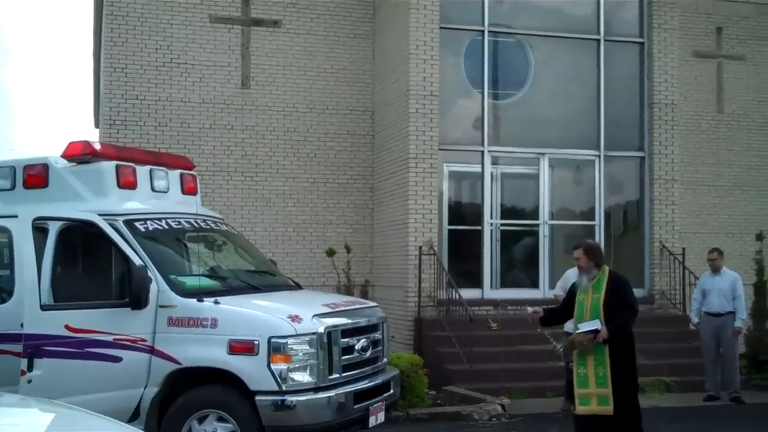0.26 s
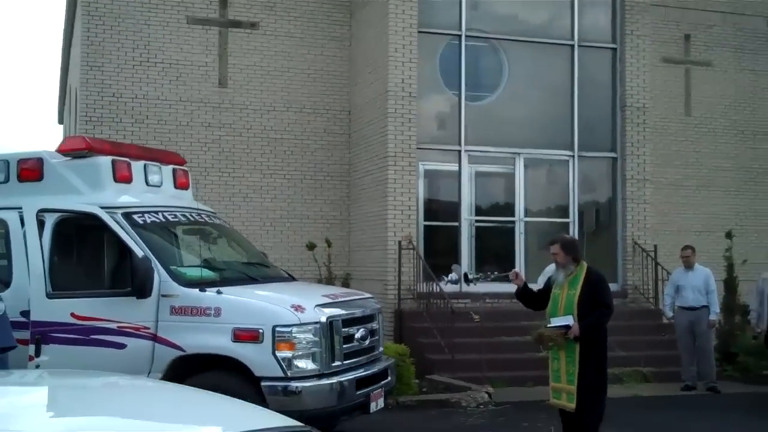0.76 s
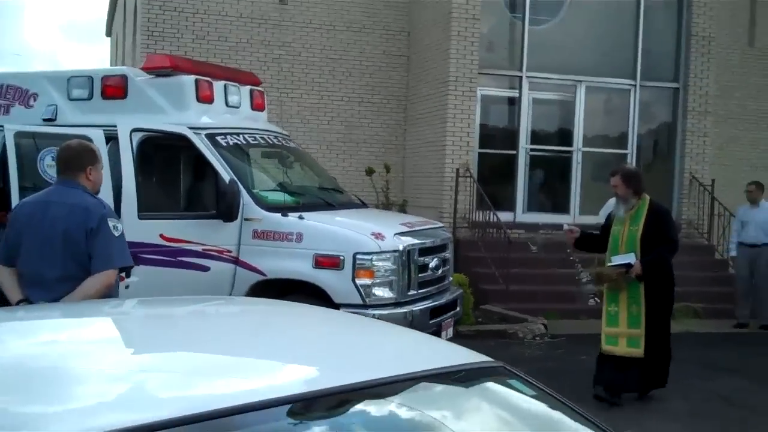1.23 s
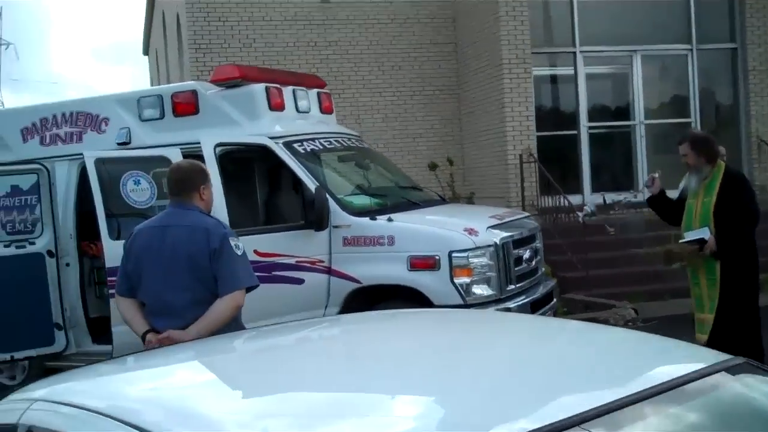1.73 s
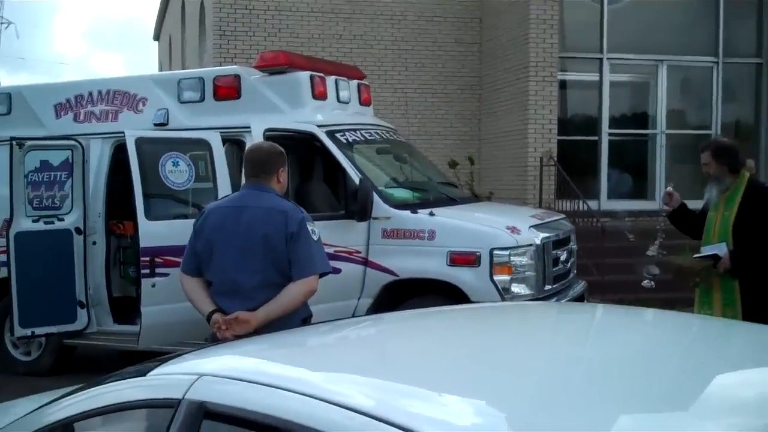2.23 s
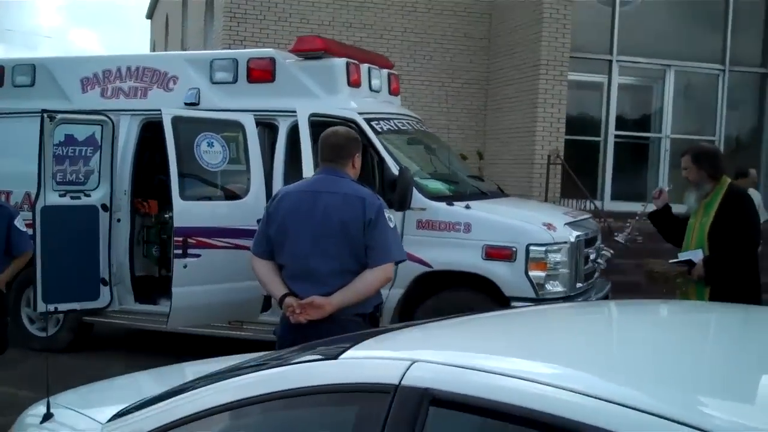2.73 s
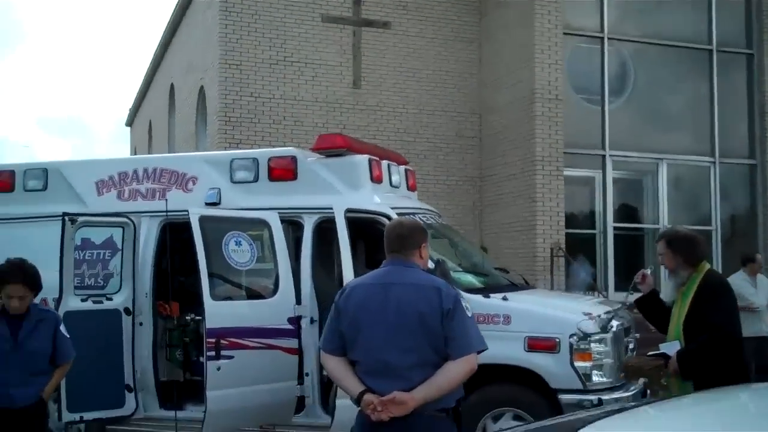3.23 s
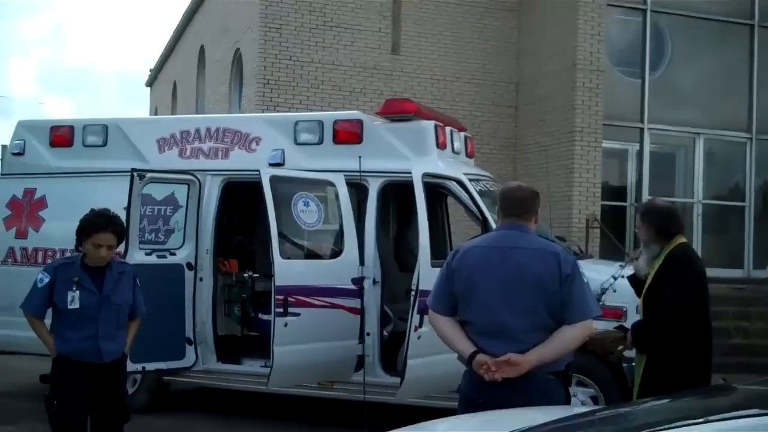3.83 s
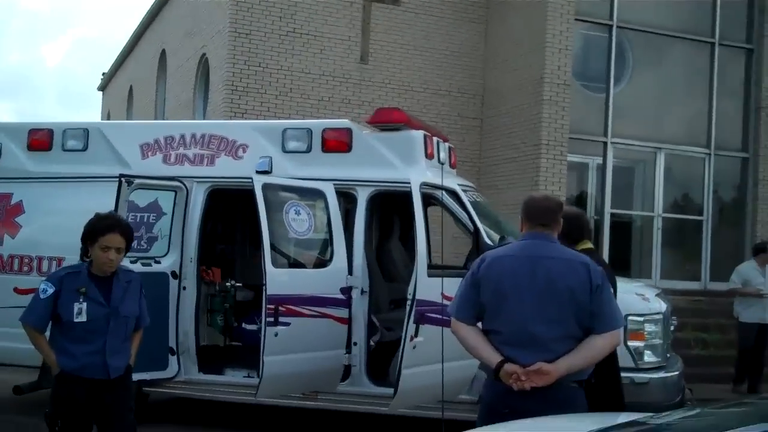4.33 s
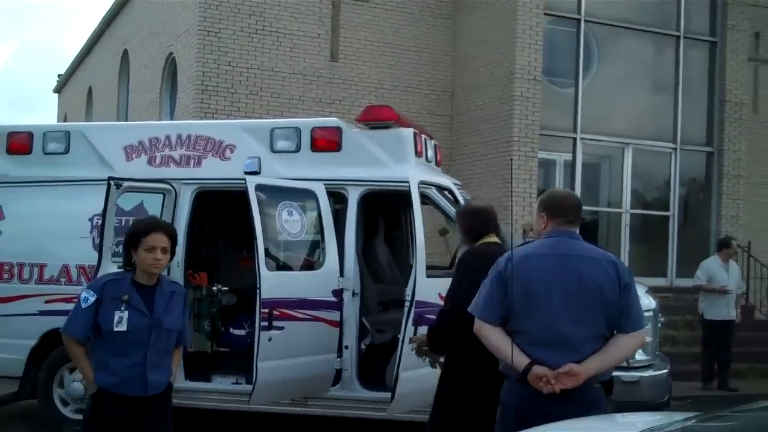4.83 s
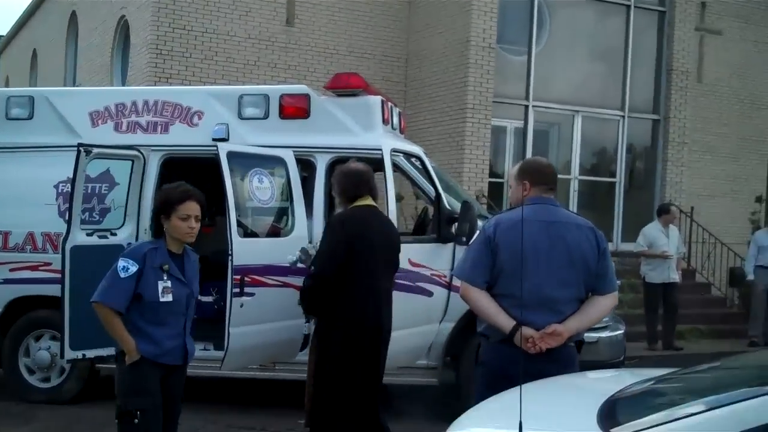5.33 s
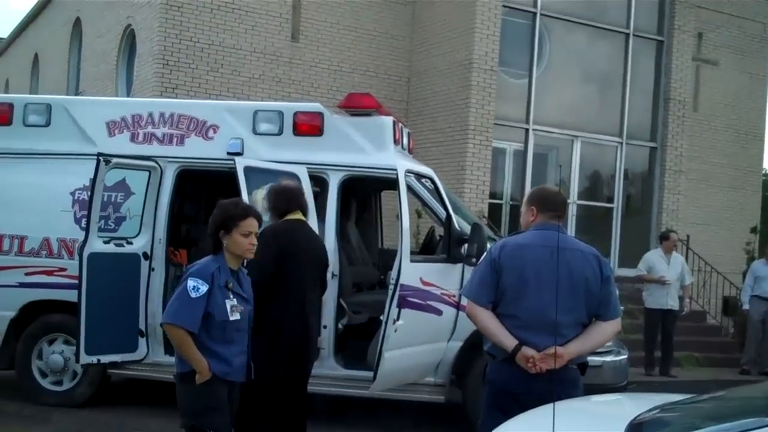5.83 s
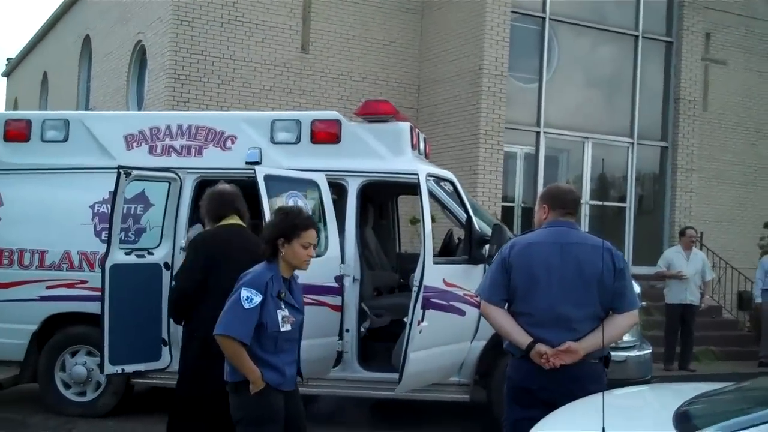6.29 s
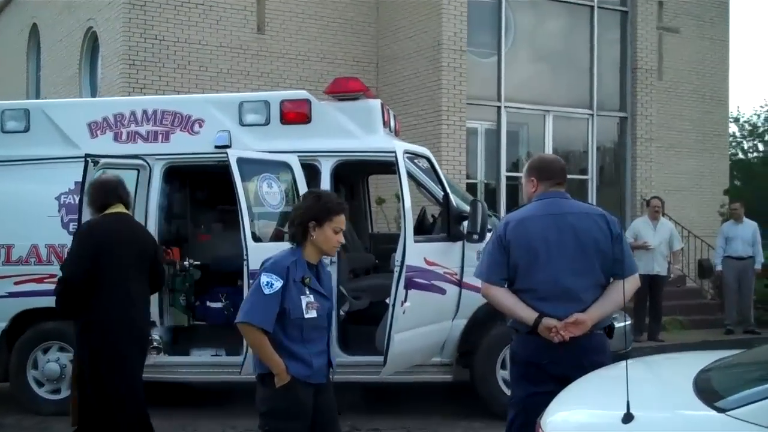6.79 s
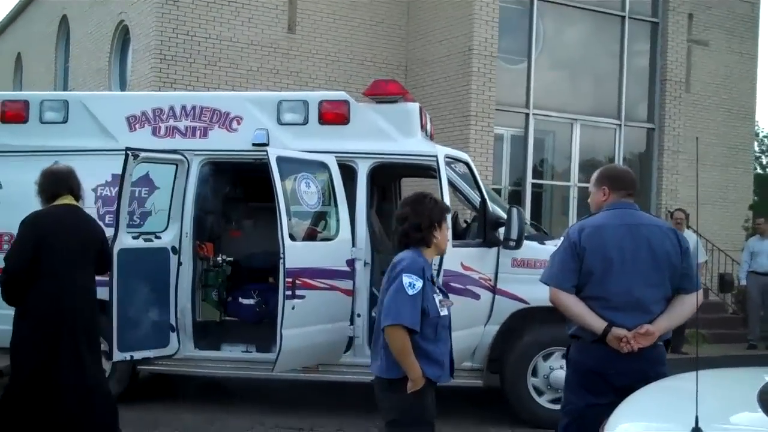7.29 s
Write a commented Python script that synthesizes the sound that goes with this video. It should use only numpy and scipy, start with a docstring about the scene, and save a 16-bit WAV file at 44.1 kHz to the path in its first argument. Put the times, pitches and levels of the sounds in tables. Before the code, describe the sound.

Small metal bells with loose pellets jingle on a swinging chain, a little left of a handheld stereo camera. Crisp high tinkles, short low clinks and brief ringing tones come irregularly, each swelling sharply and dying away. Busy at first, they thin into separated lighter shakes. Nearby hard surfaces return a short bright echo. Far traffic rushes softly throughout with a faint steady hum, and a few tiny bird chirps appear late.

```python
"""Loose pellets rattle in the small bells of a swung censer, outdoors, left of a camera, over far traffic and a hum.
The rattle is thousands of damped sines that swell with each jolt of the chain; the traffic is shaped noise.
Bells clink together as bursts of shell modes; single beating bell tones run from short low clinks to held rings.
A van and a brick wall answer as a decaying noise echo; late on, a bird chirps in short sine glides."""
import sys
import numpy as np
from scipy import signal
from scipy.fft import rfft, irfft, next_fast_len
from scipy.io import wavfile
from scipy.ndimage import map_coordinates

SR = 44100
rng = np.random.default_rng(int(sys.argv[2]) if len(sys.argv) > 2 else 0)


def dump_mix(stems):
    """Bounce the given channels to the path in sys.argv[1] as a 16-bit WAV at rate SR."""
    frames = np.atleast_2d(stems).T  # one column per channel
    limited = np.clip(frames, -1, 1)  # hard clip at full scale
    pcm = np.round(limited * 32767).astype(np.int16)
    wavfile.write(sys.argv[1], SR, pcm)


N = 332955  # length in samples

# Jerks of the chain that throw the pellets up: start_s (peak), level_db (peak), settling_t60_s
CHAIN_JOLTS = [(0.02, -33.5, 5), (0.15, -27, 0.38), (0.39, -31, 0.7), (0.86, -25, 0.77), (1.343, -27, 1.1),
               (2.016, -16, 0.25), (2.13, -31, 2.1), (2.335, -30.5, 7.4), (3.1, -20.5, 0.64),
               (3.56, -30.5, 4.5), (4.174, -24.5, 0.43), (4.5, -37, 6.6), (4.64, -29.5, 1.9),
               (4.77, -22.5, 0.19), (5.145, -35.5, 0.97), (5.339, -24, 0.1), (5.7, -26, 0.12),
               (5.76, -29.5, 0.5), (5.88, -27, 0.59), (6.389, -28.5, 0.36), (6.428, -21, 0.29),
               (6.812, -30, 0.6), (6.945, -28, 0.71), (7.279, -28, 0.24), (7.16, -42.5, 4.6),
               (7.501, -23.5, 2.2)]
# Shell modes of the bells: pitch_hz, level_db (relative)
SHELL_MODES = [(2420, -4), (2490, -3), (2650, -8.5), (2990, -4.5), (3195, -4.5), (3285, -7), (3575, -2),
               (3980, -11), (5000, -7), (5140, -10), (6200, -3), (6850, 0), (7080, 8), (7520, 5.5),
               (8080, -1), (9100, -10.5), (9710, -14.5), (11250, -15.5), (12300, -19.5), (12850, -19.5),
               (13500, -19)]
# Drift of the tone colour: start_s, low_modes_db, top_band_db
TONE_DRIFT = [(0, -3.5, -2), (3, -2, -0.5), (4.5, -3, -3.5), (5.3, -5.5, 5.5), (6, -1, -1),
              (6.5, -3.5, 8.5), (7.55, -3, 1.5)]
# Spectrum of the contact noise: frequency_hz, density_db (relative, per Hz)
CONTACT_SPECTRUM = [(1500, -15.5), (3000, 2.5), (5400, 0), (7300, 5), (10000, -11), (14000, -28)]
# Treble-rich answer of the walls: frequency_hz, level_db
WALL_ECHO = [(2500, -10), (12000, 2)]
# Echo balance between the ports: frequency_hz, right_minus_left_db
ECHO_BALANCE = [(3000, 7.5), (8000, 2), (13000, -2.5)]
# Spectrum of the traffic rush: frequency_hz, density_db (relative, per Hz)
TRAFFIC_SPECTRUM = [(15, -52), (40, 3.5), (120, 2), (730, 1.5), (1300, -1.5), (2300, -6.5), (5000, -15),
                    (9000, -22.5), (14300, -38)]
# Slow swell of the traffic, before its random waver: start_s, level_db
TRAFFIC_SWELL = [(0, -40), (7.55, -37)]
# Left-right likeness of the traffic: frequency_hz, correlation (1 = identical)
TRAFFIC_LIKENESS = [(30, 0.7), (130, 0.97), (640, 0.94), (1400, 0.66), (6770, 0.1)]
# The two machine tones: pitch_hz of the low one, pitch_hz of the high one
HUM_PITCHES = (328.7, 661)
# Strength of the machine tones, before their waver: start_s, low_tone_db, high_tone_db
HUM_LEVELS = [(0.17, -64, -53), (1.26, -58, -53), (1.49, -47, -54), (3.57, -58, -54), (4.96, -44.5, -51.5),
              (5.95, -54.5, -62), (7.53, -47.5, -63)]
# Bell on bell: start_s, level_db (relative), low_modes_db (low modes against high)
BELL_CLINKS = [(0.112, -17, -10), (0.268, -10, -3), (0.304, -9.5, -14), (0.529, -9.5, -17),
               (0.6787, -23, -8), (0.846, -14.5, -16), (0.899, -4, -12), (1.04, -26, 2), (1.2096, -17.5, 2),
               (1.2451, -15.5, 0), (1.366, -13.5, -1.5), (1.4655, -14, -7), (1.705, -18.5, 2),
               (1.7874, -13, -4.5), (1.968, -15, 5.5), (2.0035, -6.5, -12), (2.018, -24, -12),
               (2.121, -10.5, -0.5), (2.3287, -16, 3.5), (2.386, -16.5, -2), (2.459, -12, -9),
               (2.4827, -10.5, -1), (2.526, -4.5, -12), (2.6761, -19, -13), (2.7135, -15, 1),
               (2.7802, -13.5, -1), (2.942, -20, -20), (2.9811, -10, -36.5), (3.0904, -4.5, -3.5),
               (3.1377, -7, 0.5), (3.27, -13.5, 6.5), (3.3981, -8, 1), (3.457, -9, -5.5), (3.546, -3, -8.5),
               (3.5996, -5, -5), (3.7512, -33, 19), (3.9214, -13.5, -21), (4.0305, -19.5, -9),
               (4.494, -26.5, 8), (4.5973, -14, -9), (4.644, -14.5, -8), (4.9798, -19, -1.5),
               (5.1405, -17.5, -25), (5.192, -17, -29), (5.2145, -7.5, -37), (5.2785, -14, -4),
               (5.3218, -17, 0), (5.3462, -4, -21), (5.687, -12, -9), (5.876, -12.5, -6),
               (6.4163, -11.5, -22), (6.8052, -23, -12), (6.868, -19.5, -5), (6.929, -16, -8),
               (6.986, -18, -10), (7.0795, -14, -23.5), (7.264, -21, -15), (7.423, -21.5, -4)]
# Single bell tones, from short low clinks to held rings: start_s, pitch_hz, level_db, length_s (until damped)
BELL_TONES = [(0.114, 2450, -19, 0.0055), (0.117, 3970, -26.5, 0.025), (0.14, 2656, -31.5, 0.12),
              (0.264, 3280, -20.5, 0.0054), (0.898, 3190, -26, 0.14), (0.997, 2450, -26, 0.028),
              (1.041, 3194, -17.5, 0.052), (1.129, 3200, -31, 0.039), (1.191, 2476, -28, 0.019),
              (1.702, 2910, -32, 0.028), (1.803, 2454, -31, 0.044), (1.963, 3015, -24.5, 0.13),
              (1.992, 2620, -11, 0.004), (1.995, 2454, -13.5, 0.0092), (2.009, 3600, -22, 0.025),
              (2.119, 3010, -24, 0.034), (2.327, 5210, -24.5, 0.0061), (2.483, 1760, -35, 0.044),
              (2.587, 3200, -29, 0.042), (2.713, 2507, -23, 0.016), (3.137, 2970, -19.5, 0.053),
              (3.138, 4960, -11, 0.0029), (3.144, 2485, -33, 0.1), (3.261, 2963, -24.5, 0.05),
              (3.284, 2483, -14, 0.011), (3.535, 2450, -20, 0.054), (3.543, 2580, -18, 0.0095),
              (3.58, 2530, -27, 0.023), (4.032, 3977, -36.5, 0.039), (4.165, 2420, -19.5, 0.0029),
              (4.168, 2940, -33.5, 0.093), (4.289, 2990, -34.5, 0.064), (4.397, 2490, -33, 0.032),
              (4.495, 5040, -26, 0.011), (4.603, 3010, -27, 0.024), (4.713, 2560, -25.5, 0.01),
              (4.784, 3950, -38, 0.043), (5.283, 2994, -27.5, 0.045), (5.326, 3170, -29.5, 0.034),
              (5.364, 3040, -37, 0.13), (5.474, 6080, -27.5, 0.011), (5.703, 3110, -33, 0.066),
              (6.378, 3170, -34, 0.07), (6.577, 3050, -34.5, 0.032), (6.796, 3220, -36, 0.037),
              (7.265, 2485, -28, 0.024), (7.513, 3270, -30.5, 0.017), ]
# Chirps, each one glide: start_s, length_s, first_pitch_hz, last_pitch_hz, level_db
BIRD_GLIDES = [(6.12, .035, 5500, 5250, -47), (6.58, .06, 3600, 5900, -41), (6.66, .04, 6000, 4800, -41),
               (7.17, .045, 5100, 4450, -41)]
# Camera body shades the right port: frequency_hz, left_minus_right_db
CAMERA_SHADOW = [(1300, 0.5), (4400, 2.5), (8000, 10.5), (14000, 14.5)]

HIGH_MODES_HZ = 5500  # splits low rings from high tinkle
TOP_MODES_HZ, THIN_MODES_HZ = 7350, 8500  # the top band lies between; the thin shimmer above
RISE_DB_PER_S = 318  # how fast a jolt builds up
AFTER_DB, AFTER_T60_S = -17.5, 0.23  # a clink throws the pellets: rattle against the clink level, settling time
REST_DB = -42.5  # rattle between jolts
CONTACT_S = 0.0002  # time constant with which a clink wakes the modes
EDGE_HZ, TOP_HZ = 14250, 15500  # the treble steps down, then ends


def amp(db):
    """dB to gain."""
    return 10 ** (np.asarray(db) / 20)


def unit(x):
    """Scale to rms 1."""
    return x / np.sqrt(np.mean(x ** 2) + 1e-20)


def along(points, hz):
    """Read (frequency, value) points on a log frequency axis."""
    f, v = np.transpose(points)
    return np.interp(np.log(hz + 1), np.log(f + 1), v)


def curves(rows):
    """One value per sample for each column after the time."""
    s, *cols = np.transpose(rows)
    return [np.interp(np.arange(N) / SR, s, c) for c in cols]


def wobble(rate):
    """A smooth random curve, rate knots a second (39 at most)."""
    knots = rng.standard_normal(int(N * 40 / SR) + 4)
    return map_coordinates(knots, [np.arange(N) * min(rate, 39) / SR])


def filtered(x, response):
    """Multiply the spectrum of x by a response of frequency."""
    m = next_fast_len(N + SR // 2)
    return irfft(rfft(x, m) * response(np.fft.rfftfreq(m, 1 / SR)), m)[..., :N]


def mode_life(hz):
    """High modes die sooner: the base t60 in s, which each sound scales."""
    return 0.17 * (hz / 3000) ** -0.9


def detune(hz, chance):
    """No two bells are cast alike; the high modes scatter most."""
    return hz * (1 + 0.0041 * (hz / 3000) ** 0.77 * chance)


def crackle(taps, t60):
    """Contact noise that bursts and dies within milliseconds after each tap."""
    puff = amp(-60 * np.arange(SR // 20) / SR / t60)
    noise = unit(filtered(rng.standard_normal(N), lambda hz: amp(along(CONTACT_SPECTRUM, hz))))
    return noise * signal.fftconvolve(taps, puff)[:N]


def shaking_db():
    """Pellet energy: jolts build quickly, clinks start bursts, and all die away over a resting level."""
    t = np.arange(0, N, 32) / SR
    power = amp(2 * REST_DB)
    for s, db, t60 in CHAIN_JOLTS:
        slope = np.where(t < s, RISE_DB_PER_S, -60 / t60)
        power = power + amp(2 * (db + slope * (t - s)))
    for s, db, _ in BELL_CLINKS:
        burst_db = db + AFTER_DB - 60 / AFTER_T60_S * np.abs(t - s)
        power = power + (t > s) * amp(2 * burst_db)
    return np.interp(np.arange(N) / SR, t, 10 * np.log10(power))


def pings(modes, count, size, life, size_db, turn_db):
    """Random pellet taps, each waking one mode of one bell: damped sines of rms 1 in all."""
    often = amp(modes[:, 1] / 2)  # strong modes are woken more often as well as harder
    pick = rng.choice(len(modes), count, p=often / often.sum())
    t = np.arange(size) / SR
    hz, db = modes[pick].T[:, :, None]
    start = rng.integers(0, N, count)

    # which bell hangs free changes about nine times a second
    turns = rng.standard_normal((2, len(modes), N // 5000 + 1))
    free, tuning = turns[:, pick, start // 5000, None]
    db = 0.51 * db + turn_db * free + size_db * rng.standard_normal((count, 1))
    t60 = life * mode_life(hz) * np.exp(0.71 * rng.standard_normal((count, 1)))
    pitch = detune(hz, tuning + 0.68 * rng.standard_normal(hz.shape))

    attack = 1 - np.exp(-t / 0.00009)
    wave = amp(db - 60 * t / t60) * attack * np.sin(2 * np.pi * pitch * t)
    wave *= np.cos(np.pi / 2 * np.arange(size) / size)  # the pellet comes back and damps the shell
    at = start[:, None] + np.arange(size)
    return unit(np.bincount(at.ravel(), wave.ravel())[:N])


def rattle():
    """Pellets wake low rings, dense high tinkle, thin shimmer and contact hiss, all following the shaking."""
    swing_db, (low_db, top_db), modes = shaking_db(), curves(TONE_DRIFT), np.array(SHELL_MODES)
    high, thin = modes[:, 0] > HIGH_MODES_HZ, modes[:, 0] > THIN_MODES_HZ
    low_rings = pings(modes[~high], count=2400, size=2200, life=0.53, size_db=2.5, turn_db=3.5)
    tinkle = pings(modes[high & ~thin], count=4200, size=900, life=0.8, size_db=3.5, turn_db=5.0)
    shimmer = pings(modes[thin], count=3500, size=800, life=1.0, size_db=1.5, turn_db=2.5)

    taps = (rng.random(N) < 0.012) * amp(3.5 * rng.standard_normal(N))
    hiss = unit(crackle(taps, t60=0.027))
    bright = amp(-2.5) * tinkle + amp(-19) * shimmer + amp(-7.5) * hiss
    top = filtered(bright, lambda hz: (hz > TOP_MODES_HZ) & (hz < THIN_MODES_HZ))
    # adding gain - 1 of the top band sets that band to its drifting gain
    return amp(swing_db) * (amp(low_db - 1.96) * low_rings + bright + (amp(top_db) - 1) * top)


def walls(x, t60=0.098):
    """Van and brick wall answer with a decaying noise tail, different at each port and best in the treble."""
    tail = rng.standard_normal((2, SR // 3)) * amp(-60 * np.arange(SR // 3) / SR / t60)
    tail = tail / np.linalg.norm(tail[0])
    late = np.pad(x, (100, 0))[None]  # first echo after 100 samples
    wet = signal.fftconvolve(late, tail, axes=1)[:, :N]
    return filtered(wet, lambda hz: amp(along(WALL_ECHO, hz) + [[0], [1]] * along(ECHO_BALANCE, hz)))


def traffic():
    """A broad far rush of shaped noise, mixed as mid and side so that the bass is most alike at both ports."""
    def response(hz):
        turn = np.arccos(np.clip(along(TRAFFIC_LIKENESS, hz), -1, 1)) / 2
        return amp(along(TRAFFIC_SPECTRUM, hz)) * [np.cos(turn), np.sin(turn)]

    mid, side = filtered(rng.standard_normal((2, N)), response)
    level_db = curves(TRAFFIC_SWELL)[0] + 1.42 * wobble(0.9)
    return amp(level_db) * unit(np.array([mid + side, mid - side]))


def hum():
    """Two machine sines that waver in strength and slightly in phase."""
    t, out = np.arange(N) / SR, np.zeros(N)
    for hz, db in zip(HUM_PITCHES, curves(HUM_LEVELS)):
        level = np.sqrt(2) * amp(db + 0.82 * wobble(3.12))  # the table gives rms levels
        out += level * np.sin(2 * np.pi * hz * t + 0.25 * wobble(2.98))
    return out


def clinks():
    """A hard contact rings every shell mode at a new strength, briefly, with a crack of contact noise."""
    out, taps, t = np.zeros(N + SR), np.zeros(N), np.arange(SR // 5) / SR
    mode_hz, mode_db = np.transpose(SHELL_MODES)[:, :, None]
    in_top = (mode_hz > TOP_MODES_HZ) * (mode_hz < THIN_MODES_HZ)
    top_db = curves(TONE_DRIFT)[1]
    for s, db, low_db in BELL_CLINKS:
        at = round(s * SR)
        level_db = mode_db + low_db * (mode_hz < HIGH_MODES_HZ) + 3 * rng.standard_normal(mode_hz.shape)
        level_db = level_db + top_db[at] * in_top
        pitch = detune(mode_hz, rng.standard_normal(mode_hz.shape))
        phase = 2 * np.pi * (pitch * t + rng.random(mode_hz.shape))
        # the bells meet one after another, within about a millisecond
        age = np.maximum(t - 0.00111 * rng.random(mode_hz.shape) ** 2, 0)
        decay = amp(level_db - 60 * age / (0.39 * mode_life(mode_hz)))
        ring = decay * (1 - np.exp(-age / CONTACT_S)) * np.sin(phase)
        out[at:][:len(t)] += amp(db - 12.5) * ring.sum(axis=0)
        taps[at] = amp(db - 10.5)
    return out[:N] + crackle(taps, t60=0.012)


def bell_tones():
    """Single bell tones, from short low clinks to held rings: each sags a little and beats, then is damped."""
    out, t = np.zeros(N + SR), np.arange(SR // 4) / SR
    for s, hz, db, length in BELL_TONES:
        sag_db = -40 * t - 1950 * np.maximum(t - length, 0)  # slopes in dB per second
        hold = (1 - np.exp(-t / 0.00039)) * amp(sag_db)
        beat = 1 + 0.2 * np.sin(2 * np.pi * (rng.uniform(30, 90) * t + rng.random()))  # split mode pair
        tone = np.sin(2 * np.pi * (hz * t + rng.random()))
        out[round(s * SR):][:len(t)] += amp(db) * hold * beat * tone
    return out[:N]


def bird():
    """Short thin sine glides, far off, each swelling and fading."""
    out = np.zeros(N)
    for s, length, first_hz, last_hz, db in BIRD_GLIDES:
        u = np.linspace(0, 1, round(length * SR))
        glide = np.cumsum(first_hz + (last_hz - first_hz) * u) / SR
        swell = np.sin(np.pi * u) ** 0.5
        out[round(s * SR):][:len(u)] += amp(db) * swell * np.sin(2 * np.pi * glide)
    return out


def scene():
    """Censer with its echoes, over the street and the bird."""
    censer = rattle() + clinks() + bell_tones()
    return censer + amp(-4.5) * walls(censer) + traffic() + hum() + bird()


def record(dry):
    """Sound reaches the right port a little earlier, its treble weaker; peaks round off, the top is cut."""
    def ports(hz):
        shade = amp([[0.3], [-0.7]] * along(CAMERA_SHADOW, hz))
        return shade * np.exp([[-1j], [1j]] * hz * np.pi * 2.5e-5)

    def edge(hz):
        return amp(-32 * (hz > EDGE_HZ)) * (hz < TOP_HZ)

    loud = filtered(dry, ports)
    rounded = loud / (1 + np.abs(loud) ** 4) ** (1 / 4)  # the input stage rounds off the peaks
    return filtered(rounded, edge)


dry = scene()
out = record(dry)
dump_mix(out)
```